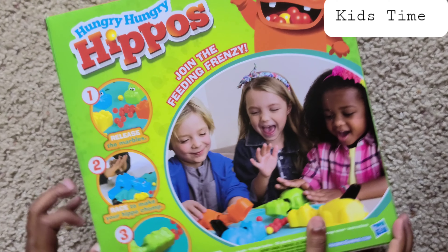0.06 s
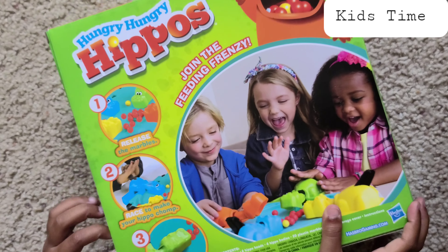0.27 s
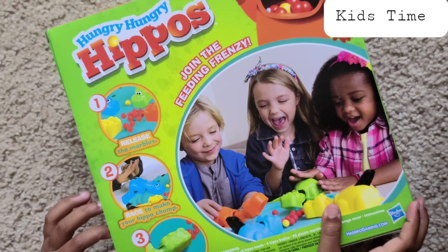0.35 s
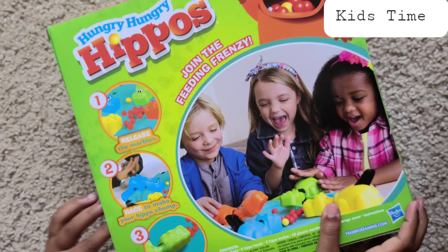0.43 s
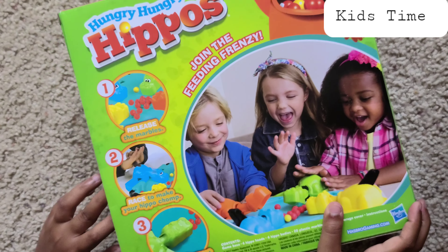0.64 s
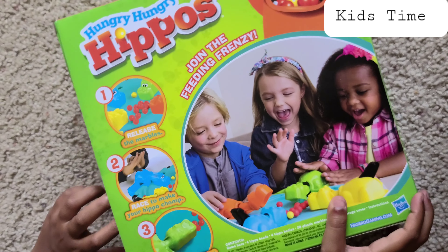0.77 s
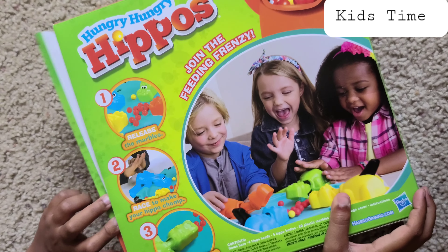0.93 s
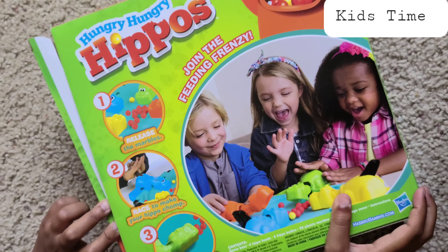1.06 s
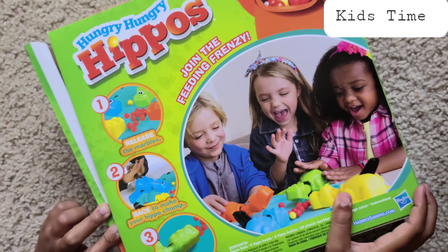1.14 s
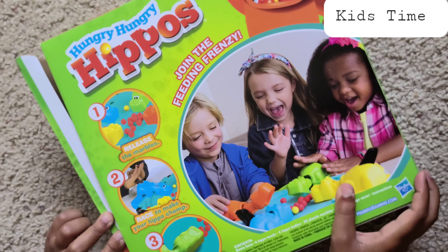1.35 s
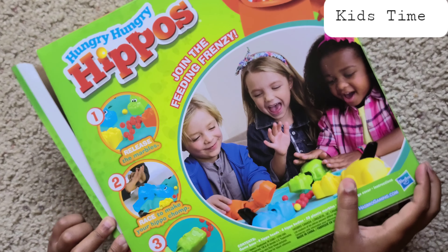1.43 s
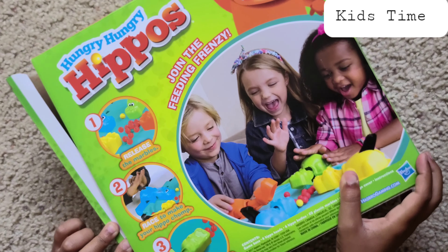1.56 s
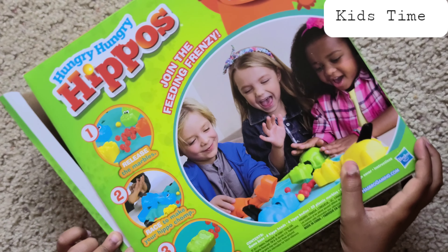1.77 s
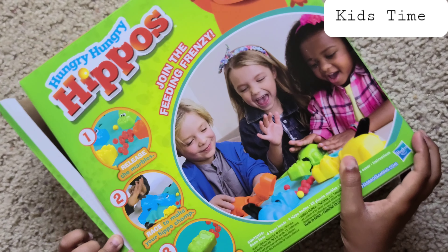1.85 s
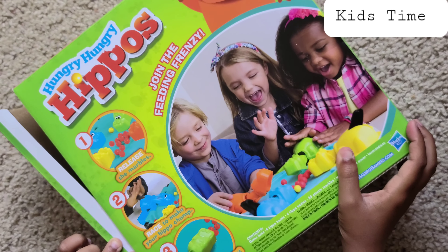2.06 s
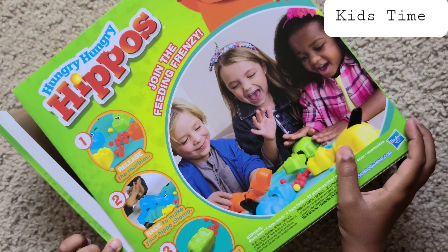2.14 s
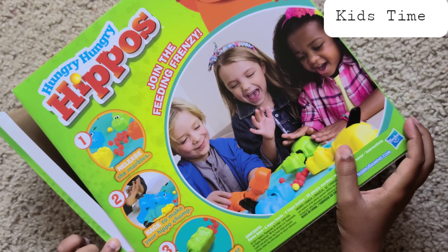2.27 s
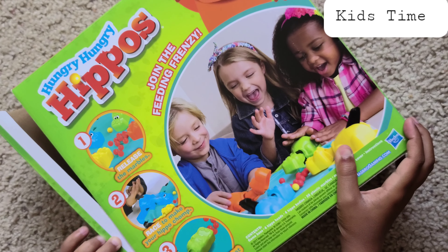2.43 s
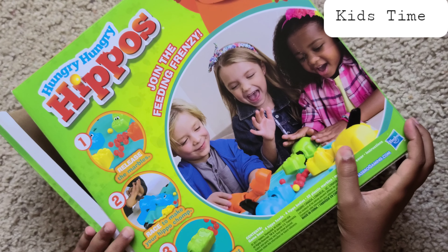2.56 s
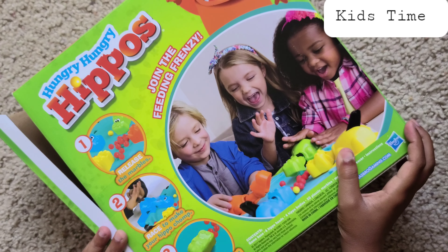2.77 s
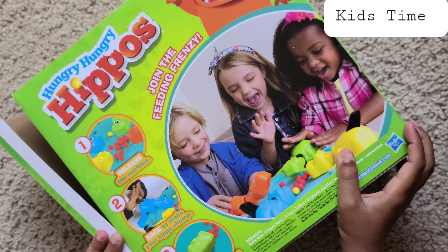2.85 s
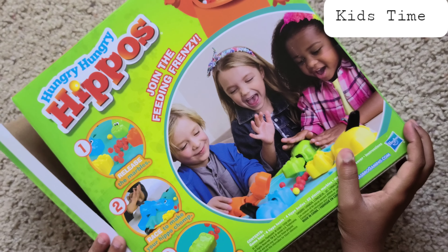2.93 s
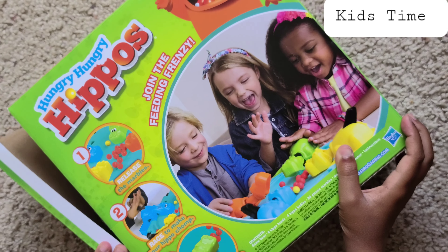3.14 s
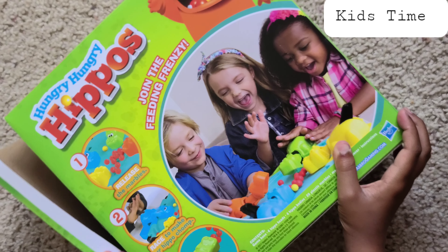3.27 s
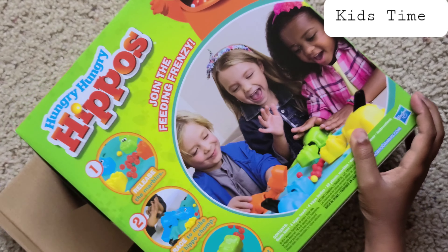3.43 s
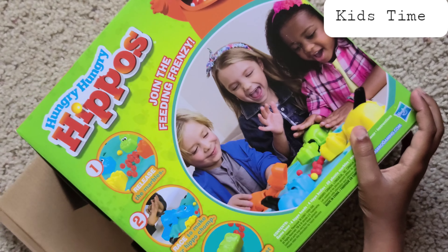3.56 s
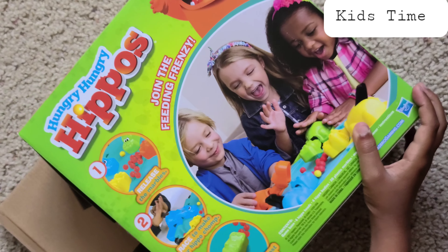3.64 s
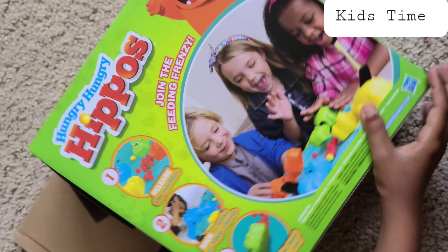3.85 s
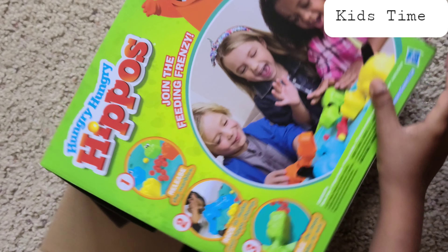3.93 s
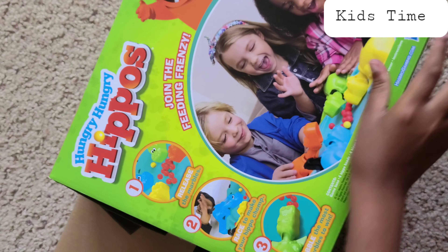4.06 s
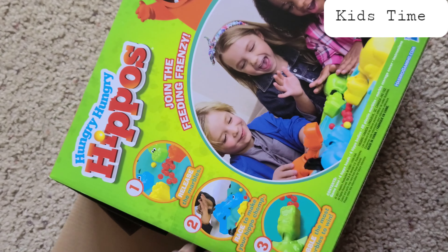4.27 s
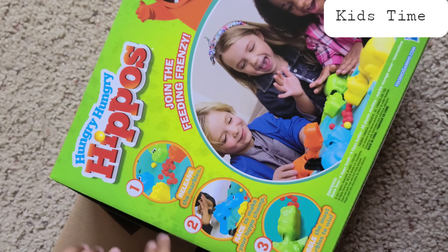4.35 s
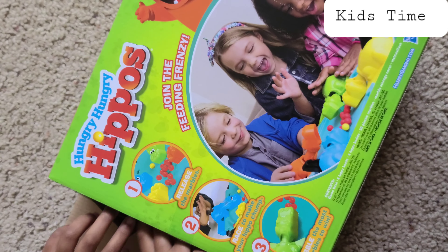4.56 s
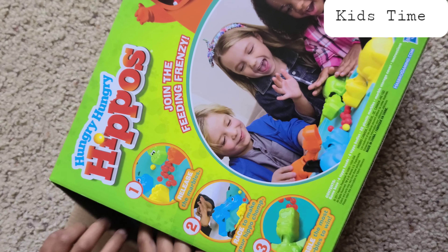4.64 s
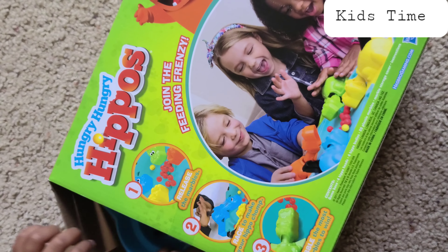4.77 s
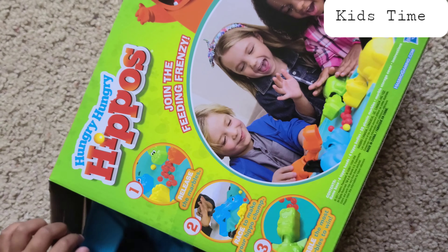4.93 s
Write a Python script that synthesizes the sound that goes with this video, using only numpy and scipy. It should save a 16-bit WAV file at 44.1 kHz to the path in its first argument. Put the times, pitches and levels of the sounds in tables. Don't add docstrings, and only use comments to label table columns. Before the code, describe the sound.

Hands turn a hollow cardboard box on carpet with faint knocks and finger hiss, a flap slaps loudly, then plastic parts scrape and tick inside.

```python
import sys
import numpy as np
from scipy import signal
from scipy.io import wavfile
from scipy.ndimage import uniform_filter1d

SR = 44100
rng = np.random.default_rng(int(sys.argv[2]) if len(sys.argv) > 2 else 0)


def attenuation_scalar(level_db):
    decades = np.asarray(level_db, float) / 20
    return 10 ** decades


def dump_mix(stems):
    frames = np.atleast_2d(stems).T
    limited = np.clip(frames, -1, 1)
    pcm = np.round(limited * 32767).astype(np.int16)
    wavfile.write(sys.argv[1], SR, pcm)


N = 392552

# t/s, level/dB
GRIP = [(0, -58), (.58, -50), (.9, -55), (1.5, -60), (2.04, -54), (2.55, -70.5), (2.8, -48.5), (3.1, -63),
        (3.4, -55.5), (4.0, -55.5), (4.35, -80), (4.6, -50), (5.42, -70.5), (6.43, -61.5), (6.7, -57.5),
        (7.6, -56.5), (8.2, -70), (8.9, -63)]
CARD_UNDER_GRIP_DB = -9
# t/s, length/s, force/dB, hiss/dB
OUTER_STROKES = [(.14, 0.12, -61, -61), (.34, 0.23, -83, -56), (.76, 0.18, -58, -59),
                 (1.0, 0.0091, -42.5, -44), (1.25, 0.56, -62.5, -60.5), (1.49, 0.15, -69, -57.5),
                 (2.78, 0.059, -76, -94), (3.05, 0.65, -64.5, -73.5), (3.76, 0.049, -76, -67),
                 (3.92, 0.16, -63.5, -58.5), (3.98, 0.086, -61, -57.5)]
FLAP_STROKES = [
    (3.378, 0.061, -42.5, -51.5),
    (3.416, 0.12, -38.5, -49.5),
    (3.53, 0.077, -48.5, -67),
]
DRAGS = [
    (4.66, 0.063, -50, -81),
    (4.56, 0.0077, -77.5, -65),
    (4.722, 0.062, -55, -47.5),
    (4.755, 0.17, -44, -50),
    (4.975, 0.069, -39, -45.5),
    (5.112, 0.07, -43.5, -48),
    (5.2, 0.098, -46, -50.5),
]
INNER_STROKES = [(5.36, 0.38, -70, -69.5), (5.66, 0.022, -58, -83), (6.1, 0.061, -58.5, -63),
                 (6.48, 0.019, -52.5, -87), (6.59, 0.058, -54.5, -68), (6.3, 0.086, -73, -78),
                 (6.66, 0.19, -60.5, -66), (6.79, 0.045, -58, -54), (6.87, 0.19, -57.5, -60.5),
                 (7.08, 0.2, -56.5, -63.5), (7.27, 0.088, -55.5, -48.5), (7.35, 0.12, -64, -53),
                 (7.51, 0.1, -53, -45), (7.7, 0.026, -59, -50), (7.76, 0.34, -74, -68),
                 (8.04, 0.25, -75.5, -70), (8.44, 0.36, -69.5, -76)]
OUTER_SHAKE_DB, FLAP_SHAKE_DB, DRAG_SHAKE_DB, INNER_SHAKE_DB = -0.5, 6, 8, 1.5
FINGER_RISE_DB_PER_S, STROKE_RISE_DB_PER_S, DRAG_RISE_DB_PER_S = 248, 500, 1799
STROKE_FALL_DB_PER_S = 450.5
FINGER_EDGE_DB = 26
PARTS_FROM_S = 3.3
# f/Hz, width/Hz, level/dB
BOX_MODES = [(145, 42, -4.5), (210, 66, -5.5), (242.8, 36, 0), (294.4, 30, -1.5), (358, 46, 1.5),
             (438.2, 126, -3.5), (507.7, 125, -6.5), (624, 78, -13)]
# f/Hz, width/Hz, level/dB
CARD_MODES = [(739.6, 79, -3.5), (1010, 200, -2.5), (1347, 320, -2.5), (1850, 590, -5.5), (2216, 590, -6),
              (2970, 370, -7.5), (3400, 485, -20)]
# f/Hz, level per Hz/dB
SKIN = [(1760, -31.5), (3000, 3), (3480, -11.5), (3930, -17), (4700, -25.5), (6960, -14), (8260, -11),
        (11300, -24), (15400, -30.5), (16100, -28), (16500, -58)]
# f/Hz, level per Hz/dB
SLIDE = [(1760, -7.5), (3000, -5), (4470, -10.5), (8500, -7.5), (12500, -8), (15500, -13), (16100, -16),
         (16500, -45.5)]
# f/Hz, width/Hz, level/dB
STREAKS = [(3480, 220, 4), (5440, 620, 5), (8350, 350, -5), (11400, 630, 0)]
# t/s, peak/dB, f/Hz, t60/s
TURN_KNOCKS = [(0.199, -38, 303, 0.15), (0.227, -30.5, 392, 0.075), (0.393, -27, 278, 0.046),
               (0.523, -36, 124, 0.071), (0.615, -41, 360, 0.054), (0.776, -40.5, 310, 0.054),
               (0.799, -26, 124, 0.05), (0.979, -18.5, 105.5, 0.05), (0.994, -23, 364.5, 0.13),
               (1.011, -29, 370, 0.033), (1.518, -37.5, 384, 0.082), (1.643, -40.5, 383, 0.088),
               (1.683, -40, 410, 0.056), (1.834, -36.5, 396, 0.074), (1.931, -42.5, 379, 0.34),
               (1.981, -36.5, 389, 0.18), (2.128, -43.5, 115, 0.26), (2.54, -42.5, 292, 0.2),
               (2.795, -28.5, 381, 0.037), (2.814, -29.5, 362, 0.017), (3.189, -38, 379.6, 0.37)]
FLAP_KNOCKS = [
    (3.386, -21.5, 142, 0.021),
    (3.418, -4, 427, 0.021),
    (3.421, -0.5, 259, 0.048),
    (3.434, -13, 413, 0.019),
    (3.443, -11, 300, 0.035),
    (3.462, -14.5, 366.5, 0.11),
    (3.486, -13, 289, 0.037),
    (3.502, -29, 293, 0.033),
    (3.531, -23, 317, 0.074),
]
TRAY_KNOCKS = [(4.469, -37, 151, 0.047), (4.514, -37, 376, 0.098), (4.627, -27.5, 305.6, 0.21),
               (4.692, -31.5, 473, 0.14), (4.772, -25, 395, 0.059), (4.807, -12, 454, 0.027),
               (4.942, -21, 372, 0.064), (4.98, -13, 498, 0.076), (4.999, -18, 145, 0.097),
               (5.036, -21, 160.4, 0.13), (5.065, -23.5, 519.5, 0.22), (5.23, -25, 258, 0.046),
               (5.262, -29, 447.5, 0.18)]
INNER_KNOCKS = [(5.956, -42, 380, 0.081), (6.105, -35, 397.5, 0.27), (6.131, -31.5, 472, 0.06),
                (6.461, -24.5, 398.5, 0.15), (6.584, -31.5, 234, 0.016), (6.613, -29, 110, 0.094),
                (6.636, -30.5, 167, 0.073), (6.993, -36.5, 274.6, 0.3), (7.055, -34, 297, 0.13),
                (7.27, -34, 397, 0.062), (7.443, -33, 358, 0.11), (7.502, -26, 373, 0.1),
                (7.522, -26.5, 377, 0.12), (7.585, -23.5, 400, 0.072)]
MORE_KNOCKS = [(.398, -29.5, 124, 0.049), (0.404, -37.5, 370, 0.12), (.535, -42, 374, 0.1),
               (0.582, -37.5, 375, 0.039), (0.64, -38, 386, 0.06), (3.381, -26.5, 406, 0.096),
               (3.419, -7.5, 793, 0.033), (3.449, -32, 805, .04), (3.47, -23, 736, 0.04),
               (5.845, -49, 361, 0.084), (5.946, -43.5, 408, 0.053), (6.022, -52.5, 438, 0.054),
               (6.086, -33.5, 121, 0.052), (6.115, -33.5, 160, 0.066), (6.151, -33, 164, 0.056),
               (6.15, -34.5, 358, 0.12), (6.106, -31, 1010, 0.036), (5.291, -31.5, 417, 0.033),
               (3.424, -11.5, 147.4, 0.088), (0.191, -38, 127, 0.11), (1.849, -49.5, 148, 0.091),
               (2.14, -44, 169, 0.13), (2.668, -44, 148, 0.12), (5.866, -49, 186, 0.14),
               (7.252, -39, 396, 0.036), (7.412, -43, 331, 0.087), (8.194, -53, 135.4, 0.071),
               (8.405, -48, 152.4, 0.084), (8.512, -50.5, 380, .08), (8.602, -49.5, 286, 0.13),
               (3.426, -2.5, 250.6, 0.039), (3.447, -14, 265, 0.026), (3.497, -16.5, 302, .05),
               (6.466, -20, 400, 0.059), (6.777, -23.5, 1038, .04), (6.779, -22.5, 1380, 0.018),
               (4.941, -20.5, 1077, 0.015), (5.238, -17, 288, 0.069), (7.494, -41, 406, 0.063),
               (7.545, -35, 394, 0.15), (6.466, -28, 1250, 0.018)]
PANEL_SIDE = 0.2
# t/s, peak/dB, f/Hz, hardness/dB
EDGE_TICKS = [(.393, -33, 1100, -27), (.516, -40, 1850, -39), (.771, -33, 4030, -21),
              (.976, -32.5, 1320, -17), (.997, -28.5, 990, -9.5), (1.972, -43, 1160, -23),
              (2.153, -44, 1210, -23.5), (2.565, -48, 2330, -10), (2.784, -47, 1130, -55),
              (2.866, -60, 1070, -28), (2.904, -57, 1220, -33), (2.99, -54, 1140, -42),
              (3.189, -37.5, 1160, -39), (3.32, -40.5, 1400, -33), (3.378, -34.5, 1010, -12.5),
              (3.419, -8.5, 1460, -22), (3.432, -16.5, 1430, -29.5), (3.453, -19.5, 800, -17.5),
              (3.482, -26, 790, -14.5), (3.51, -30.5, 1290, -20), (3.754, -49, 1460, -1.5),
              (3.8, -38, 2770, -25)]
TRAY_TICKS = [(4.472, -47, 1054, -40), (4.518, -39, 1010, -78), (4.592, -47, 1230, -21),
              (4.632, -33.5, 1030, -66), (4.653, -38, 970, -13.5), (4.702, -30.5, 1050, -38),
              (4.799, -26, 1500, -26), (4.941, -18, 990, -61), (5.022, -28.5, 1070, -21),
              (5.238, -28.5, 730, -30), (5.25, -27.5, 1045, -13)]
PART_TICKS = [(5.619, -43, 2030, -22), (5.651, -32.5, 2050, -24), (5.661, -24.5, 1410, -19),
              (5.965, -47.5, 840, -35.5), (6.081, -44.5, 1080, -27), (6.108, -38, 1430, -30),
              (6.135, -47.5, 776, -13), (6.229, -39.5, 2570, -17), (6.394, -47, 970, -38),
              (6.466, -25.5, 2860, -28), (6.577, -40.5, 1010, -22), (6.616, -30.5, 2350, -20),
              (6.639, -64, 1950, -3), (6.693, -45, 1950, -12), (6.778, -23.5, 1050, -11),
              (7.041, -44.5, 1100, -24), (7.254, -32.5, 2280, -4), (7.276, -29.5, 2720, -7.5),
              (7.583, -26, 920, -40), (7.7, -43.5, 2810, -3.5), (7.917, -49.5, 3010, -3),
              (7.981, -61, 1410, 6), (8.034, -52, 834, 3.5), (8.518, -36, 3150, -14.5),
              (8.749, -54, 1160, -6.5)]
SCUFF_S, SNAP_T60_S = .015, 0.049
TICK_CYCLES, CRACK_FOLLOWS, CRACK_DB = 29.9, 0.31, -4.5
# t/s, peak/dB, f/Hz, t60/s
SKIDS = [(3.449, -24, 15000, 0.026), (3.482, -28.5, 10100, 0.032), (3.505, -35, 10880, 0.051),
         (3.419, -20, 2000, 0.02), (3.807, -42, 8600, 0.021), (4.05, -55, 14000, 0.028),
         (4.75, -39.5, 7430, 0.064), (4.757, -47, 13000, .04), (4.775, -47, 9500, .05),
         (4.83, -32.5, 7300, 0.068), (4.983, -30, 1700, 0.02), (4.93, -43, 12000, 0.036),
         (4.998, -39, 13000, .04), (5.022, -28.5, 6600, 0.044), (4.998, -27, 1700, .02),
         (5.101, -42, 13000, .02), (5.114, -30.5, 14000, .04), (5.125, -31, 11000, .03),
         (5.147, -27.5, 12400, 0.042), (5.165, -31, 13500, .05), (5.187, -29, 13500, 0.037),
         (5.248, -29, 12000, 0.025), (5.144, -29.5, 1940, 0.05), (5.187, -34, 3170, .04),
         (4.8, -32, 2600, 0.094), (6.467, -40, 3200, 0.015), (6.479, -44, 2480, 0.057),
         (6.6, -41, 1540, 0.055), (6.63, -39, 4800, 0.048), (6.124, -40.5, 4300, 0.098),
         (3.35, -25, 13500, 0.011), (8.526, -46, 3400, 0.07), (6.083, -46.5, 1900, 0.026),
         (6.108, -39, 2100, 0.14), (6.613, -39, 1300, 0.029), (5.073, -46, 3700, 0.089),
         (0.996, -17.5, 8700, 0.022), (1.008, -29.5, 8300, 0.22), (.974, -36, 11000, 0.058),
         (0.99, -32, 8500, 0.062), (1.03, -37.5, 5500, 0.2), (7.255, -23, 11800, 0.017),
         (7.276, -27.5, 1360, 0.021), (7.516, -33, 1370, 0.15), (7.55, -37, 1800, 0.07),
         (7.583, -31, 1510, 0.034), (7.608, -34, 9000, 0.06), (2.8, -51, 1000, .08),
         (0.52, -39.5, 1200, 0.046), (2.866, -48, 1300, .02), (2.903, -45, 1300, .02),
         (2.975, -43, 1105, .025), (6.569, -41.5, 5200, 0.044), (3.5, -49, 6300, .12)]
SKID_RISE_S, SKID_WIDTH = 0.002, 0.23
# t/s, length/s, level/dB
TRAY_RUBS = [(0.974, .014, -44), (4.72, .03, -52.5), (4.768, 0.046, -41), (4.803, 0.091, -40.5),
             (4.942, 0.065, -45), (5.106, 0.14, -43), (5.223, 0.06, -48), (5.667, 0.037, -50.5),
             (6.464, 0.028, -52.5), (6.613, 0.019, -61), (7.27, 0.03, -60), (7.509, 0.082, -42.5),
             (7.585, 0.028, -52)]
# f/Hz, width/Hz, level/dB
TRAY_MODES = [(1220, 140, -1.5), (1500, 120, -3), (1950, 70, 1.5), (2670, 140, -2), (3150, 120, -4),
              (3680, 60, -10.5), (3950, 62, -14.5)]
# t/s, length/s, level/dB
RIM_STROKES = [
    (3.786, 0.021, -50),
    (3.87, 0.061, -61.5),
    (3.956, 0.085, -55),
]
# f/Hz, width/Hz, level/dB
RIM_MODES = [(1417, 70, -4.5), (1900, 60, -4), (2770, 160, 0), (3990, 98, -5), (5170, 140, -11),
             (8700, 434, -19.5), (11500, 700, -14.5)]
# t/s, f/Hz, level/dB
SQUEAK = [
    (2.71, 5950, -96),
    (2.75, 6120, -80),
    (2.79, 6570, -89),
    (2.805, 7150, -88),
    (2.83, 6960, -76),
    (2.89, 7100, -86),
    (2.96, 7150, -98),
]
# t/s, level/dB
SHIFTS = [(.42, -56), (1.0, -53), (1.53, -50), (2.13, -47.5), (2.6, -52), (3.438, -46), (5.0, -50),
          (5.85, -55.5), (6.64, -54.5), (7.3, -52.5), (8.001, -70), (8.399, -54), (8.75, -52)]
SHIFT_RISE_DB_PER_S, SHIFT_FALL_DB_PER_S, RUMBLE_FLOOR_DB = 42, 42.5, -65
# f/Hz, level per Hz/dB
AIR = [(12, -38), (20, -36.5), (43, 4), (69, 5), (131, -10.5), (195, -20), (323, -7.5), (652, -12.5),
       (1320, -15), (3140, -23), (7940, -41), (8890, -33), (12500, -27.5), (15700, -39), (16500, -42.5)]
AIR_DB = -60.5
# f/Hz, correlation
LIKENESS = [(60, 0.8), (180, -0.28), (550, -0.7), (1650, -0.005), (4970, 0.3), (15000, -0.35)]
ROOM_T60_S, BRIGHT_T60_S = 0.19, 0.088
ROOM_DB, WALL_CUT_HZ, RIGHT_LAG_S = -8.5, 12000, 0.00012


def rms_one(x):
    return x / np.sqrt(np.mean(x ** 2) + 1e-20)


def peak_one(x):
    return x / np.max(np.abs(x))


def in_time(rows):
    s, *columns = np.transpose(rows)
    return [np.interp(np.arange(N) / SR, s, c) for c in columns]


def at_hz(points, hz):
    points_hz, values = np.transpose(points)
    return np.interp(np.log(hz), np.log(points_hz), values)


def band(x, low_hz, high_hz):
    edges_hz = [low_hz, min(high_hz, .45 * SR)]
    return signal.sosfilt(signal.butter(2, edges_hz, "band", fs=SR, output="sos"), x)


def resonance(x, hz, width_hz):
    r = np.exp(-np.pi * width_hz / SR)
    poles = [1, -2 * r * np.cos(2 * np.pi * hz / SR), r * r]
    return signal.lfilter((1 - r * r) / 2 * np.array([1, 0, -1]), poles, x)


def add(out, sound, s):
    i = round(s * SR)
    out[..., i:i + sound.shape[-1]] += sound[..., :N - i]


def drift(rate_hz):
    r = np.exp(-80 * np.pi * rate_hz / SR)
    white = rng.standard_normal(N // 40 + 2002)
    slow = signal.lfilter([1], [1, -2 * r, r * r], white)[2000:]
    return np.interp(np.arange(N) / 40, np.arange(len(slow)), rms_one(slow))


def grains(per_s, spread_db, clump_db):
    sizes = attenuation_scalar(spread_db * np.minimum(rng.exponential(1, N), 4)) * rng.choice([-1, 1], N)
    born = rng.random(N) < per_s * attenuation_scalar(clump_db * drift(25)) / SR
    return rms_one(rms_one(sizes * born) + .8 * rng.standard_normal(N))


def body(modes, source, wander_db):
    total = 0
    for k, (hz, width_hz, level_db) in enumerate(modes):
        gain = attenuation_scalar(level_db + wander_db * drift(24.0))
        total = total + (-1) ** k * gain * resonance(source, hz, width_hz)
    return rms_one(total)


def banded(spectra, share, source, patchy_db):
    out, edges_hz = 0, 20 * 2 ** np.arange(0, 10.1, .4)
    for k, (low, high) in enumerate(zip(edges_hz, edges_hz[1:])):
        if high < spectra[0][0][0]:
            continue
        mid, side = band(source[k % 2], low, high)
        hz = np.sqrt(low * high)
        alike = np.clip(at_hz(LIKENESS, hz), -1, 1)
        level_db = (1 - share) * at_hz(spectra[0], hz) + share * at_hz(spectra[1], hz)
        gain = attenuation_scalar(level_db + patchy_db * drift(6.3))
        out = out + gain * (np.sqrt(1 + alike) * mid + np.sqrt(1 - alike) * side * [[1], [-1]])
    return rms_one(out)


def humps(rows, fall_db_per_s):
    t, power = np.arange(0, N + 32, 32) / SR, 1e-12
    for s, length_s, level_db, rise in rows:
        before_db = (s - t) * rise
        after_db = (t - s - length_s) * min(fall_db_per_s, 2 * rise)
        loss_db = np.maximum(0, np.maximum(before_db, after_db))
        power = power + attenuation_scalar(level_db - loss_db) ** 2
    return np.interp(np.arange(N) / SR, t, np.sqrt(power))


def strokes():
    groups = [(OUTER_STROKES, OUTER_SHAKE_DB, FINGER_RISE_DB_PER_S, FINGER_EDGE_DB),
              (FLAP_STROKES, FLAP_SHAKE_DB, DRAG_RISE_DB_PER_S, np.inf),
              (DRAGS, DRAG_SHAKE_DB, DRAG_RISE_DB_PER_S, np.inf),
              (INNER_STROKES, INNER_SHAKE_DB, STROKE_RISE_DB_PER_S, np.inf)]
    scrape, slide, shake = [], [], []
    for table, shake_db, fastest, edge_db in groups:
        for s, length_s, force_db, hiss_db in table:
            rise = min(fastest, edge_db / length_s)
            scrape.append((s, length_s, force_db, rise))
            slide.append((s, length_s, hiss_db, rise))
            shake.append((s, length_s, force_db + shake_db, rise))
    return [humps(rows, STROKE_FALL_DB_PER_S) for rows in (scrape, slide, shake)]


def hollow_box(grip_db, shake):
    slips = grains(per_s=240, spread_db=2.0, clump_db=3.5)
    return np.hypot(attenuation_scalar(grip_db), shake) * body(BOX_MODES, slips, wander_db=3.0)


def stiff_card(grip_db, scrape):
    slips = grains(per_s=500, spread_db=1.0, clump_db=2.0)
    return np.hypot(attenuation_scalar(grip_db + CARD_UNDER_GRIP_DB), scrape) * body(CARD_MODES, slips, wander_db=3.5)


def sliding_hiss(slide, opened):
    fine = np.array([grains(per_s=2500, spread_db=3.0, clump_db=4.0) for k in range(4)]).reshape(2, 2, N)
    flutter = attenuation_scalar(np.where(opened, 2.4, .8) * drift(45))
    hiss = slide * flutter * banded([SKIN, SLIDE], opened, fine, patchy_db=2.2)
    song = sum(attenuation_scalar(db + 1.8 * drift(2.1)) * resonance(hiss, hz, width) for hz, width, db in STREAKS)
    return hiss + ~opened * song


def crackle(slide, opened):
    return opened * attenuation_scalar(-8.0) * slide * band(grains(per_s=400, spread_db=3.5, clump_db=4.5), 1800, 15500)


def knocks():
    out, t = np.zeros((2, N)), np.arange(round(.25 * SR)) / SR
    rows = TURN_KNOCKS + FLAP_KNOCKS + TRAY_KNOCKS + INNER_KNOCKS + MORE_KNOCKS
    luck = rng.standard_normal((len(rows), len(BOX_MODES) + 1, 2))
    for (s, peak_db, hz, t60), (push, *row) in zip(rows, luck):
        dying = attenuation_scalar(-60 * t / np.clip(t60, .02, .3)) * (1 - np.exp(-t * hz / 1.23))
        sound = np.sin(2 * np.pi * hz * t * (1 - 0.41 * t))
        side = PANEL_SIDE * np.tanh(push[1]) * np.cos(2 * np.pi * hz * t * (1 - 0.25 * t))
        for (mode_hz, _, level_db), (z, lean) in zip(BOX_MODES, row):
            nearness = min(mode_hz / hz, np.sqrt(hz / mode_hz))
            mode = nearness * attenuation_scalar(level_db - 7.5) * np.sin(2 * np.pi * mode_hz * t)
            sound = sound + z * mode
            side = side + PANEL_SIDE * lean * mode
        stereo = peak_one((sound + side * [[1], [-1]]) * dying)
        add(out, np.sign(push[0]) * attenuation_scalar(peak_db) * stereo, s)
    return band(out, 47, 7800)


def ticks():
    out, t = np.zeros((2, N)), np.arange(round(.15 * SR)) / SR - SCUFF_S
    after = np.maximum(t, 0)
    rows = EDGE_TICKS + TRAY_TICKS + PART_TICKS
    scratch = rng.standard_normal((len(rows), 4, len(t)))
    for (s, peak_db, hz, snap_db), (contact, left, right, rough) in zip(rows, scratch):
        t60 = np.clip(TICK_CYCLES / hz, .008, .2)
        crack_db = CRACK_DB + CRACK_FOLLOWS * snap_db
        rise = 1 - np.exp(-after / (.035 * t60))
        touch = rise * (attenuation_scalar(-60 * after / t60) + 0.58 * attenuation_scalar(-60 * after / (3.6 * t60)))
        touch = touch + 0.093 * np.exp(-np.abs(t) / 0.011)
        touch = touch * attenuation_scalar(22 * uniform_filter1d(rough, size=90))
        blow = contact * touch
        sound = 9.0 * resonance(blow, hz, 150 + 0.058 * hz)
        for k, (mode_hz, width_hz, level_db) in enumerate(CARD_MODES[:4]):
            sound = sound + attenuation_scalar(level_db) * resonance(blow, mode_hz, width_hz) * (-1) ** k
        sound = band(band(sound, .55 * hz, 7000), .45 * hz, 9000)
        wide = (contact + 1.47 * np.array([left, right])) * touch
        crack = attenuation_scalar(crack_db + 8.0) * peak_one(band(wide, 1500, 3630))
        snap = band(band(wide * attenuation_scalar(-60 * after / SNAP_T60_S), 5870, 14000), 4700, 13560)
        snap = attenuation_scalar(snap_db + 12.5) * peak_one(snap)
        add(out, attenuation_scalar(peak_db) * (peak_one(sound) + crack + snap), s - SCUFF_S)
    return out


def skids():
    out, t = np.zeros((2, N)), np.arange(round(.12 * SR)) / SR
    scratch = rng.standard_normal((len(SKIDS), 4, len(t)))
    for (s, peak_db, hz, t60), (both, left, right, rough) in zip(SKIDS, scratch):
        level_db = -60 * t / np.clip(t60, .01, .15) + 29.4 * uniform_filter1d(rough, size=90)
        touch = (1 - np.exp(-t / SKID_RISE_S)) * attenuation_scalar(level_db)
        wide = resonance((both + 1.7 * np.array([left, right])) * touch, hz, SKID_WIDTH * hz)
        add(out, attenuation_scalar(peak_db) * peak_one(band(wide, 0.44 * hz, 18200)), s)
    return out


def tray():
    force = humps([(*row, DRAG_RISE_DB_PER_S) for row in TRAY_RUBS], STROKE_FALL_DB_PER_S)
    slips = grains(per_s=350, spread_db=1.0, clump_db=5.0)
    return force * band(body(TRAY_MODES, slips, wander_db=5.5), 1000, 4100)


def rim():
    force = humps([(*row, FINGER_RISE_DB_PER_S) for row in RIM_STROKES], STROKE_FALL_DB_PER_S)
    return force * body(RIM_MODES, grains(per_s=900, spread_db=1.5, clump_db=6.0), wander_db=6.5)


def squeak():
    hz, level_db = in_time(SQUEAK)
    t = np.arange(N) / SR
    on = (t > SQUEAK[0][0]) & (t < SQUEAK[-1][0])
    cycles = np.cumsum(hz * (1 + 0.03 * drift(150))) / SR
    return on * attenuation_scalar(level_db + 11.0 + 2.5 * drift(40)) * np.sin(2 * np.pi * cycles)


def floor_rumble():
    shifts = humps([(s, 0, db, SHIFT_RISE_DB_PER_S) for s, db in SHIFTS], SHIFT_FALL_DB_PER_S)
    weight = np.hypot(attenuation_scalar(RUMBLE_FLOOR_DB), shifts)
    return weight * attenuation_scalar(3.1 * drift(36)) * rms_one(band(rng.standard_normal(N), 51, 77.0))


def room_drone():
    return attenuation_scalar(-61.5 + 2.2 * drift(1.3)) * rms_one(resonance(rng.standard_normal(N), 120, 17))


def room_air():
    return attenuation_scalar(AIR_DB) * banded([AIR, AIR], 0, rng.standard_normal((2, 2, N)), patchy_db=1.2)


def microphones(x):
    t = np.arange(round(.5 * SR)) / SR
    white = rng.standard_normal((2, len(t))) * (t > .002)
    lows = (band(white, 510, 3000) + 0.47 * band(white, 8.1, 500)) * attenuation_scalar(-60 * t / ROOM_T60_S)
    highs = band(white, 3000, 16000) * attenuation_scalar(-60 * t / BRIGHT_T60_S)
    mid, side = lows + highs
    side = 1.71 * band(side, 380, 15000) + 0.26 * band(side, 30, 300)
    dull = np.exp(-2 * np.pi * WALL_CUT_HZ / SR)
    tails = signal.lfilter([1 - dull], [1, -dull], [mid + side, mid - side])
    tails = attenuation_scalar(ROOM_DB) * tails / np.sqrt(np.sum(tails ** 2) / 2)
    late = np.interp(np.arange(N) - RIGHT_LAG_S * SR, np.arange(N), x[1])
    return np.array([x[0], late]) + signal.fftconvolve(x, tails, axes=1)[:, :N]


def scene():
    grip_db, = in_time(GRIP)
    scrape, slide, shake = strokes()
    opened = np.arange(N) / SR > PARTS_FROM_S
    rubbing = hollow_box(grip_db, shake) + stiff_card(grip_db, scrape) + crackle(slide, opened)
    contacts = knocks() + ticks() + skids()
    singing = tray() + rim() + squeak()
    close = rubbing + contacts + singing + floor_rumble() + room_drone()
    close = close * attenuation_scalar([[-.9], [.9]])
    return microphones(close) + sliding_hiss(slide, opened) + room_air()


def roll_off(x):
    return signal.sosfilt(signal.butter(12, 16500, fs=SR, output="sos"), x)


def record(dry):
    dipped = dry - 0.5 * resonance(dry, 6930, 2014)
    cut = signal.sosfilt(signal.cheby2(20, 40, 16050, fs=SR, output="sos"), dipped)
    mix = 1.126 * np.tanh(cut / 1.212)
    return roll_off(mix)


dry = scene()
out = record(dry)
dump_mix(out)
```